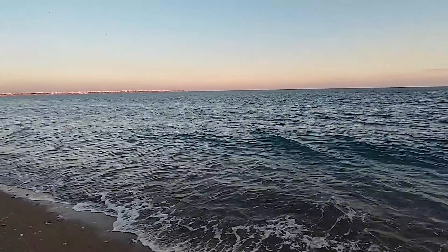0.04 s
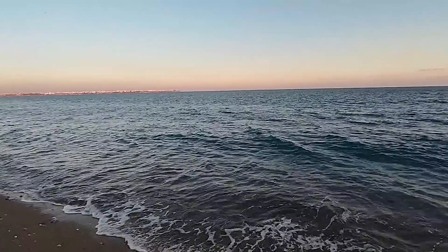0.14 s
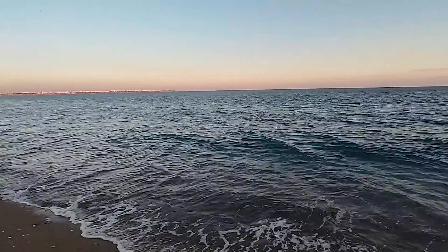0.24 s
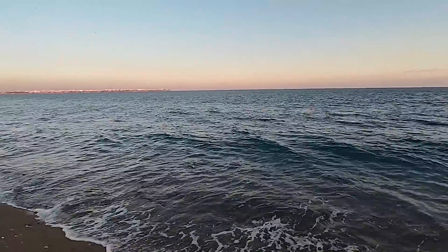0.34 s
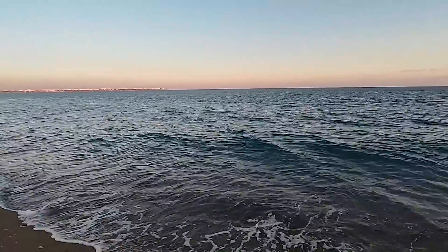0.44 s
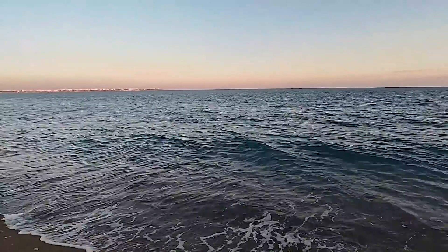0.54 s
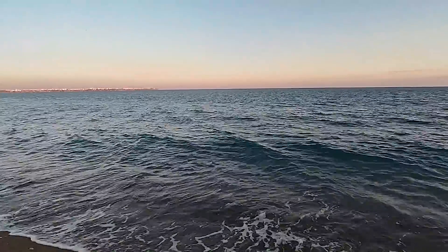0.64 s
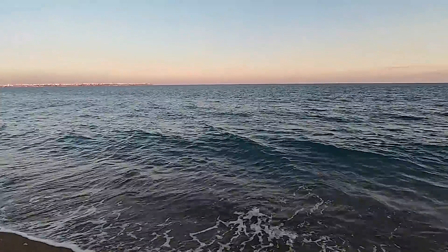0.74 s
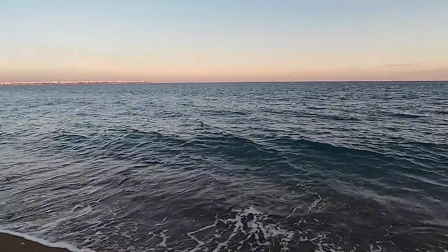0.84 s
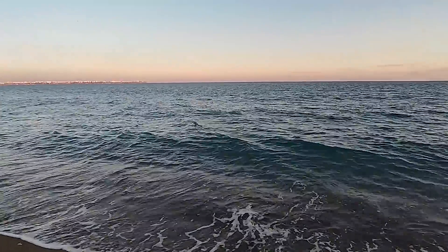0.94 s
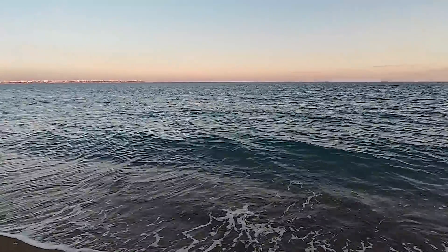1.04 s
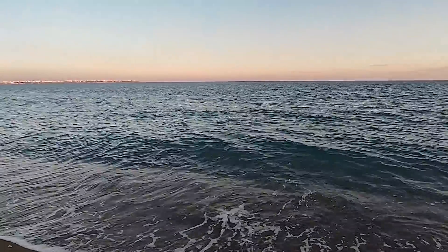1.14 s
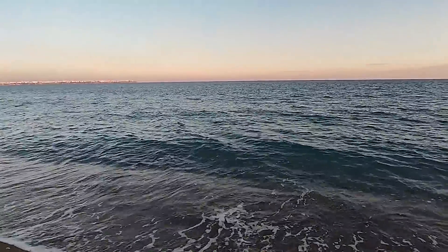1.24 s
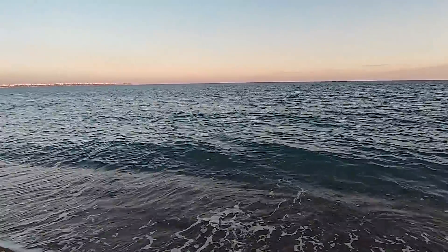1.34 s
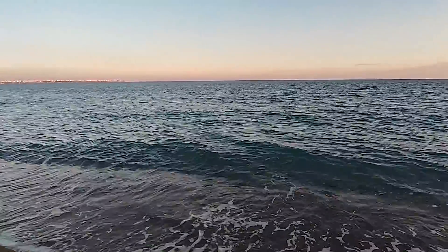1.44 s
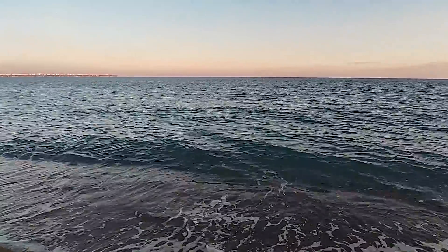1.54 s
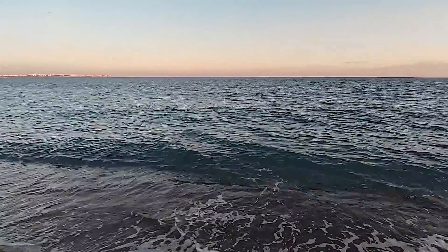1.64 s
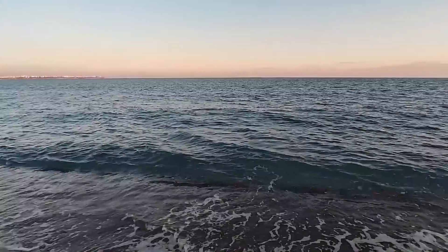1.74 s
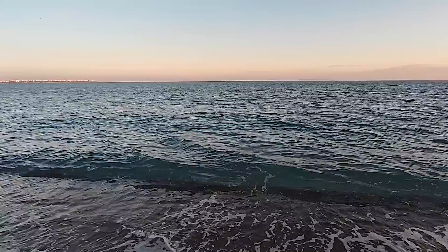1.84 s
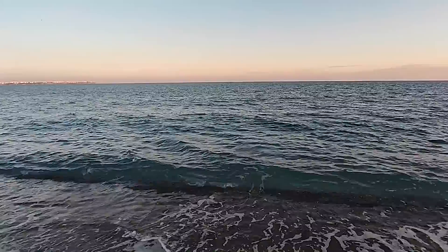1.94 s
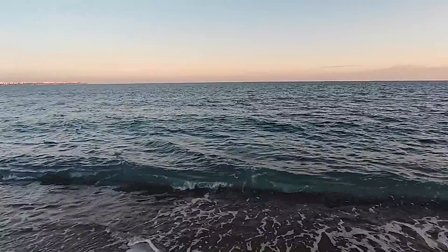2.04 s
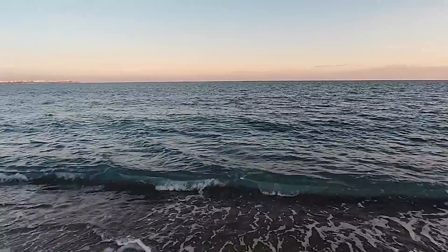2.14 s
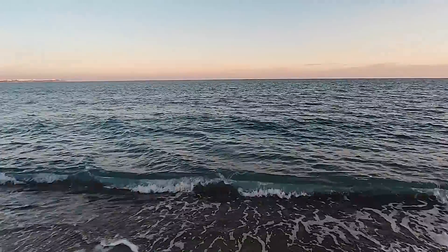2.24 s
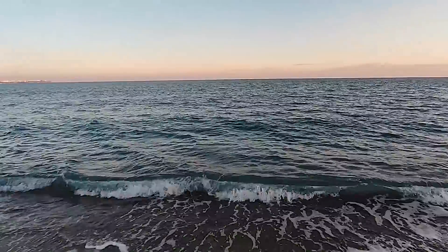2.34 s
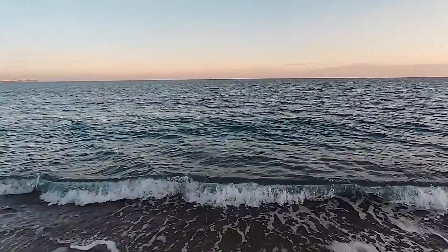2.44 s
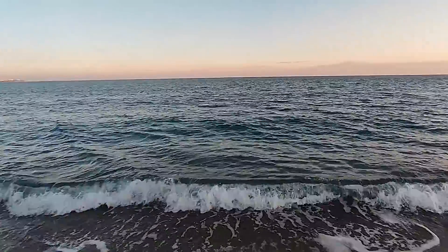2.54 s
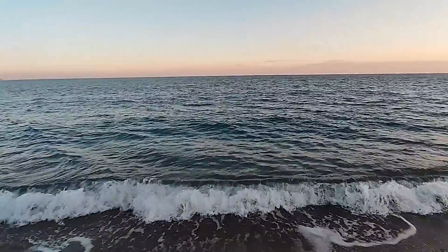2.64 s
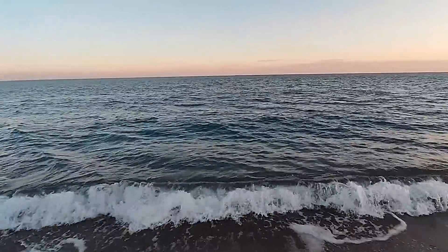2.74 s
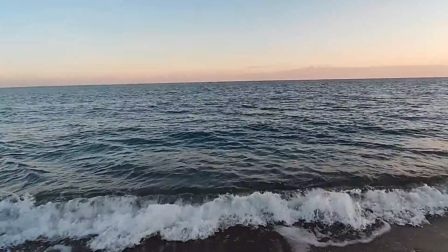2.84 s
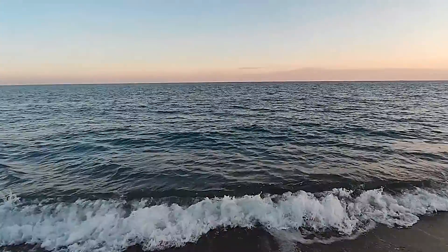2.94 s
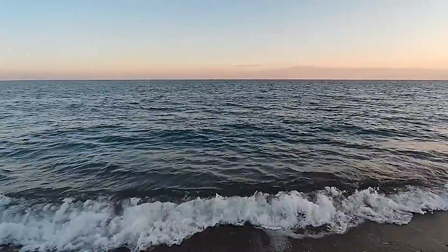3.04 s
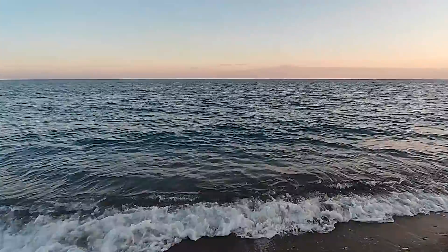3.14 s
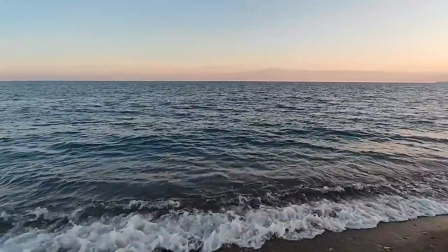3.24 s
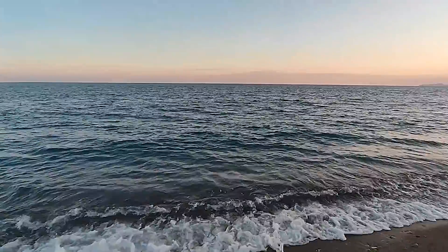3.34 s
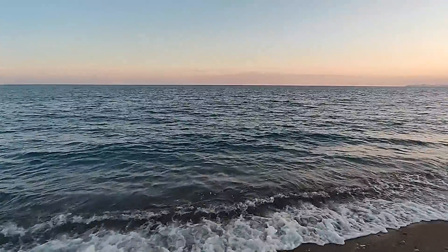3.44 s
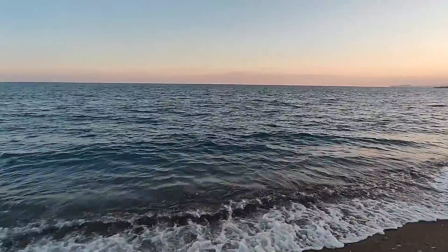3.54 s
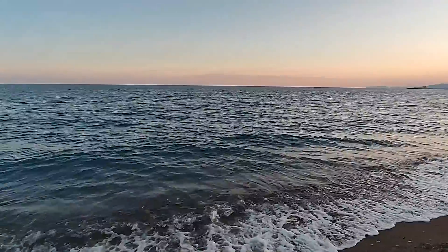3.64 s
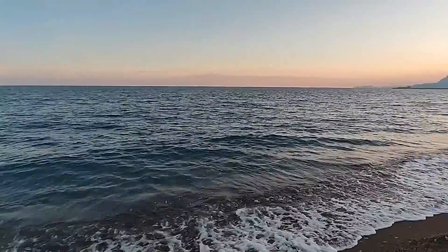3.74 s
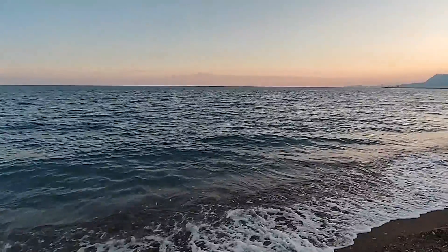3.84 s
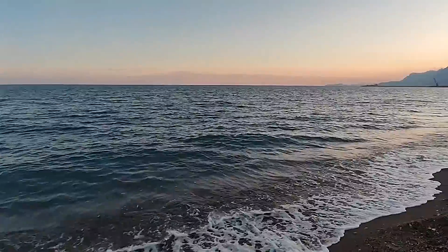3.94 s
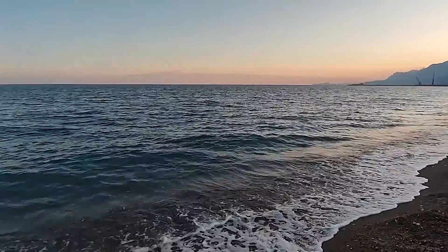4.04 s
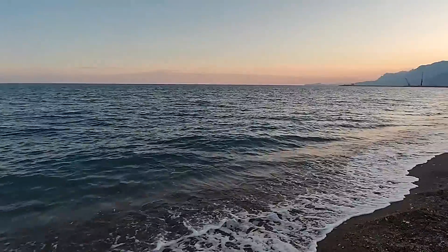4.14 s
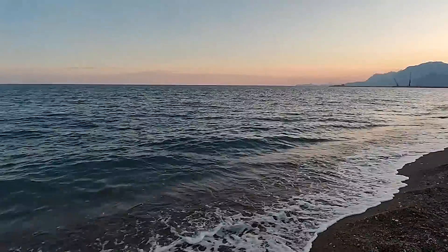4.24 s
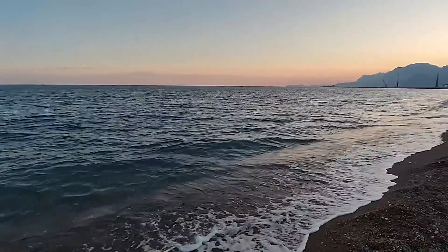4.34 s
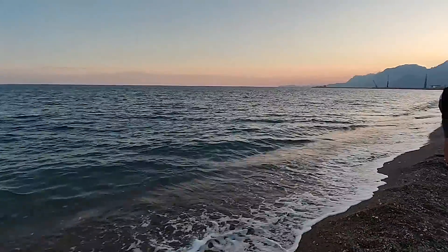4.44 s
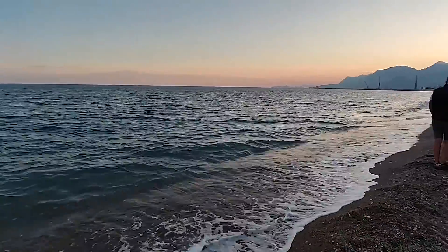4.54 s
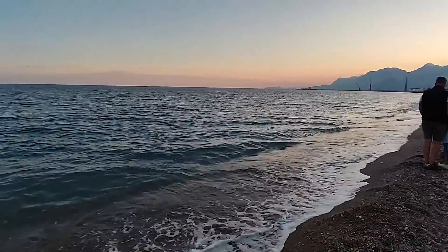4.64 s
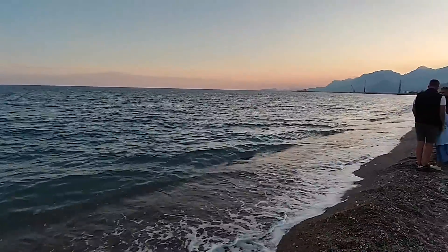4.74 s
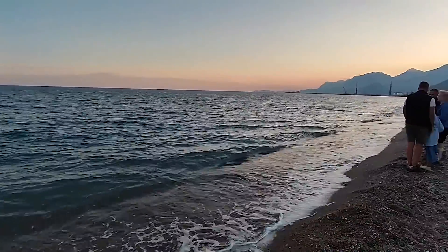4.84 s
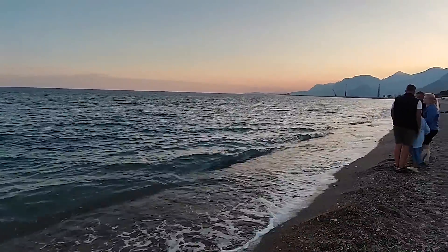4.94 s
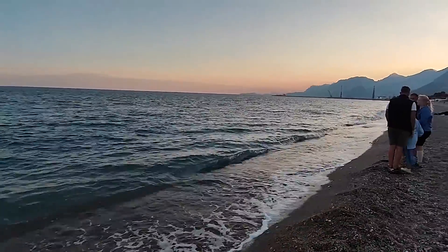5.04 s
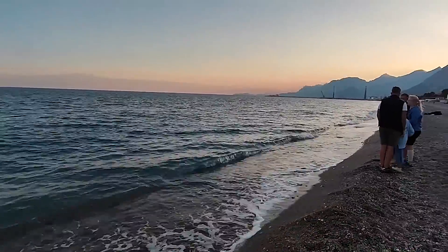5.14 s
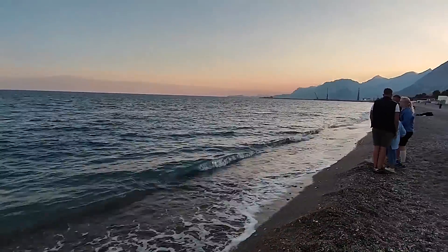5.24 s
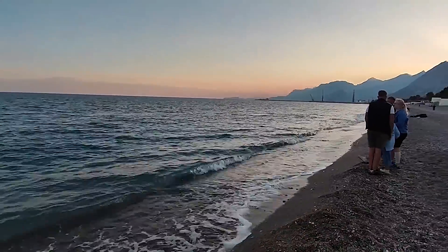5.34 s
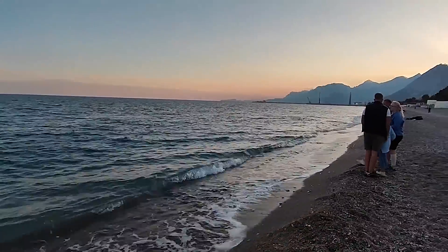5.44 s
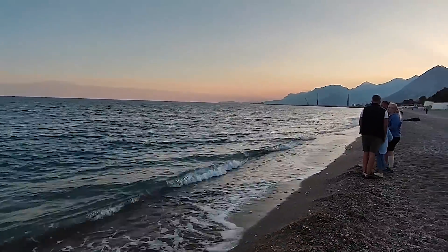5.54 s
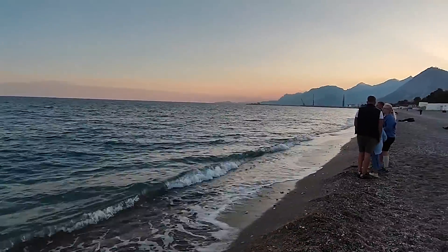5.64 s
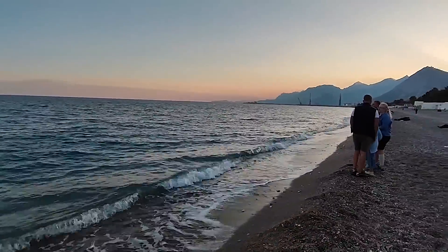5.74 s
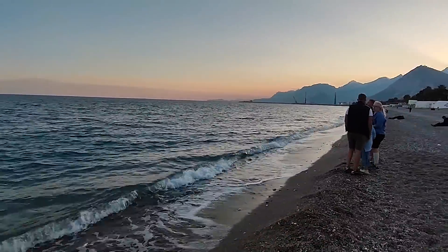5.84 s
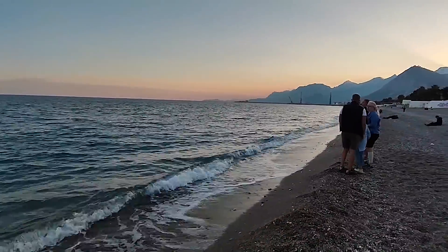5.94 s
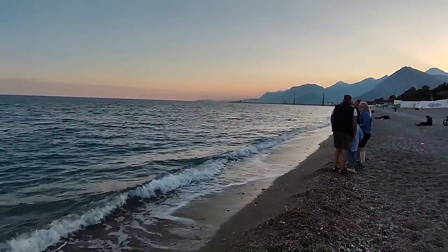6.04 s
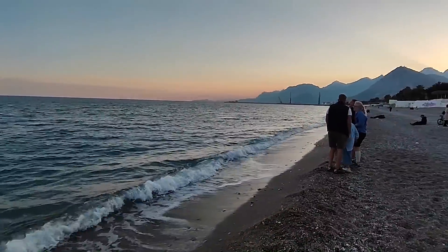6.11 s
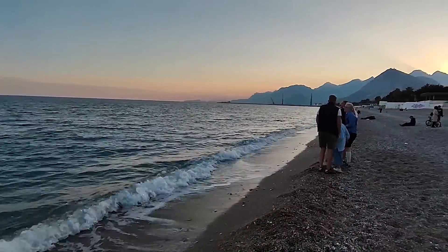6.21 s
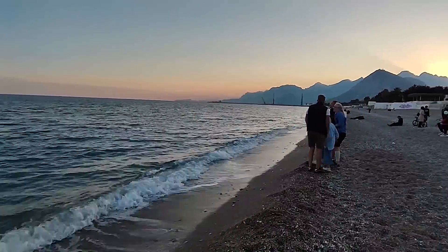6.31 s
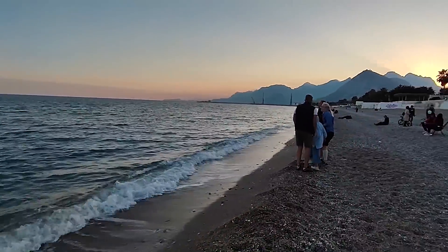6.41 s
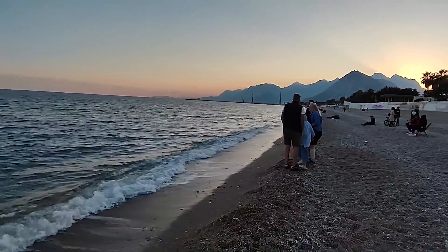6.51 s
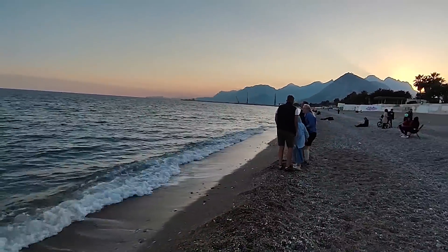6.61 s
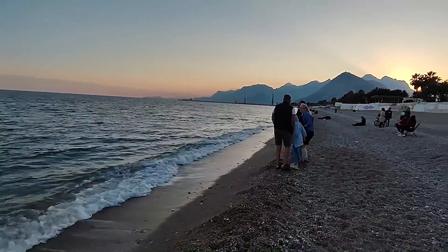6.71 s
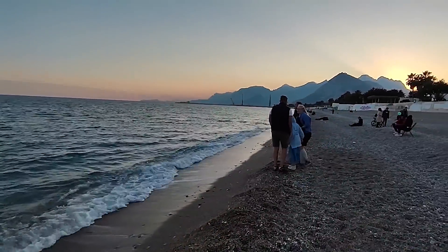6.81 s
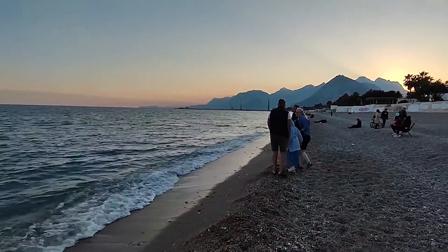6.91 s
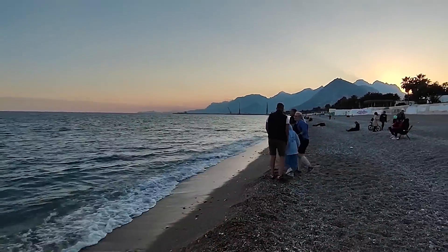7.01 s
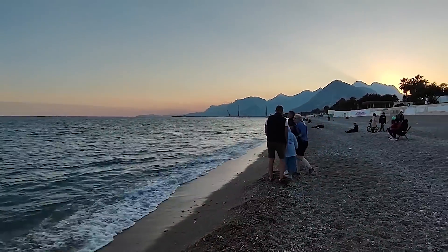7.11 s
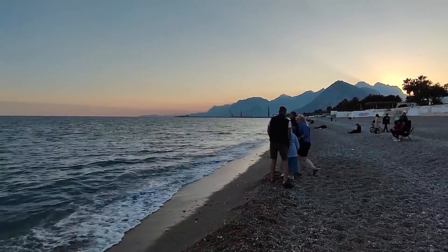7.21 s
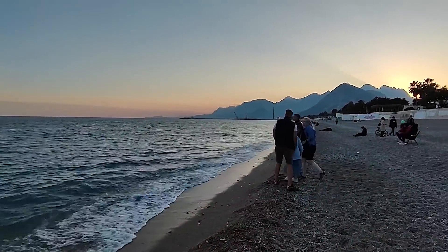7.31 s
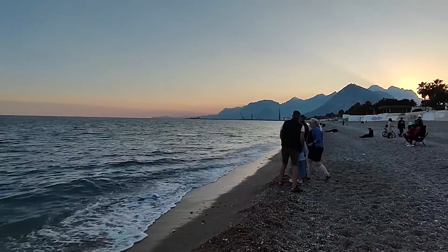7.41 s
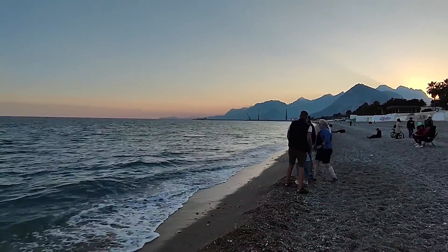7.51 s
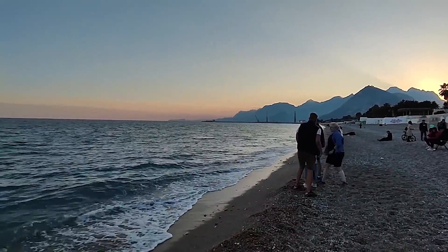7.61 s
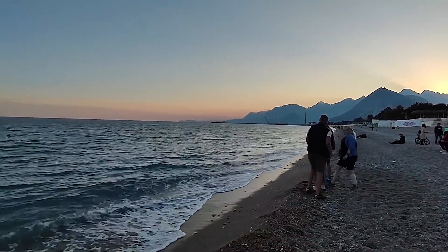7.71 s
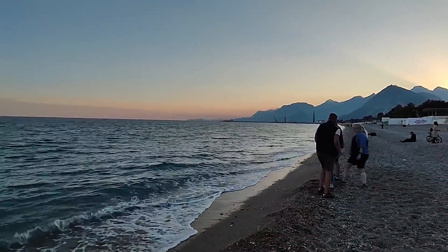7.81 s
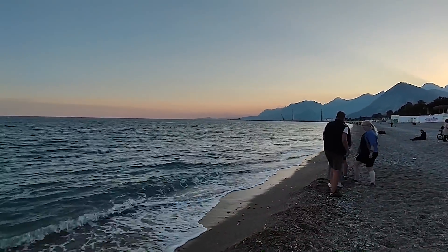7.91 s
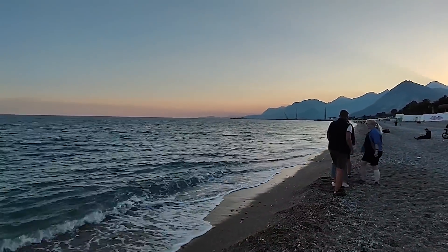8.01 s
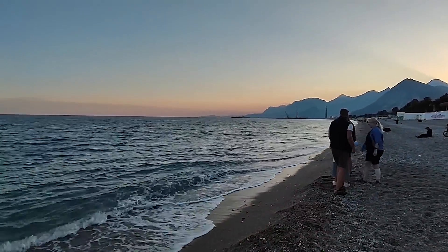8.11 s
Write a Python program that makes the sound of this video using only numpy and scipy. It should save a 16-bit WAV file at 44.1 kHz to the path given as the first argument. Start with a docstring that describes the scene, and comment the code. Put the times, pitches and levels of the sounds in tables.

```python
"""Small waves on a pebble beach. Wind buffets a camera's two microphone ports throughout, as filtered noise.
A weak wave builds while narrow bands of surf hiss glide upward; a pebble clacks as a damped ring.
At 2.2 s a wave plunges: noise and bubble rings roar, stone ticks hiss, then foam pops linger up the beach.
The hand-held camera turns from the sea to look along the shore by 4.8 s, and the next crest gurgles in
swells of noise. A second wave plunges at 5.7 s; near 7.6 s a very high hiss passes as a third begins."""
import sys
import numpy as np
from scipy import signal
from scipy.fft import rfft, irfft, next_fast_len
from scipy.io import wavfile
from scipy.ndimage import uniform_filter1d, map_coordinates

SR = 44100
rng = np.random.default_rng(int(sys.argv[2]) if len(sys.argv) > 2 else 0)


def inscribe(sig):
    """Save sig as 16-bit PCM at rate SR to the path in sys.argv[1].

    A 1-D sig is mono; a 2-D sig holds one channel per row.
    Samples are clipped to [-1, 1] before scaling.
    """
    pcm = np.round(np.clip(np.atleast_2d(sig).T, -1, 1) * 32767)
    wavfile.write(sys.argv[1], SR, pcm.astype(np.int16))


N = 360193


def amp(db):
    """Decibels to gain."""
    return 10 ** (np.asarray(db) / 20)


def unit(x):
    """Scale to rms 1."""
    return x / np.sqrt(np.mean(x ** 2) + 1e-20)


def along(points, hz):
    """Read (frequency, value) points on a log frequency axis."""
    point_hz, value = np.transpose(points)
    return np.interp(np.log(hz + 1), np.log(point_hz + 1), value)


def curve(points):
    """Draw a (time, value) curve, one value per sample."""
    times_s, values = np.transpose(points)
    return np.interp(np.arange(N) / SR, times_s, values)


def wobble(rate):
    """A smooth random curve, rate knots a second."""
    knots = rng.standard_normal(int(N * rate / SR) + 4)
    coarse = np.arange(0, N + 32, 32)
    return np.interp(np.arange(N), coarse, map_coordinates(knots, [coarse * rate / SR]))


def filtered(x, response):
    """Filter x by a gain that is a function of frequency."""
    size = next_fast_len(x.shape[-1] + 8192)
    spectrum = rfft(x, size) * response(np.fft.rfftfreq(size, 1 / SR))
    return irfft(spectrum, size)[..., :x.shape[-1]]


def coloured(x, spectrum):
    """Shape x by a spectrum, then bring it to rms 1."""
    return unit(filtered(x, lambda hz: amp(along(spectrum, hz))))


def swell(centre_s, half_length_s):
    """A bell-shaped envelope around a moment."""
    distance = (np.arange(N) / SR - centre_s) / half_length_s
    return np.exp(-.5 * np.minimum(distance ** 2, 60))


def bursts(rows, spectrum):
    """Short swells of noise, one for each (centre_s, level_db, half_length_s) row."""
    total = np.zeros(N)
    flutter = coloured(rng.standard_normal(N), spectrum)
    for centre_s, level_db, half_length_s in rows:
        shape = swell(centre_s, half_length_s)
        local_rms = np.sqrt(np.average(flutter ** 2, weights=shape ** 2))
        total += amp(level_db) * shape * flutter / local_rms
    return total


def rush(patchy_db):
    """Two unrelated white noises with shared, drifting patches of random gain."""
    z = signal.stft(rng.standard_normal((2, N)), nperseg=512)[2]
    field = uniform_filter1d(rng.standard_normal(z.shape[1:]), size=7, axis=0)  # across frequency
    field = uniform_filter1d(field, size=14, axis=1)  # across time
    return unit(signal.istft(z * amp(patchy_db * unit(field)), nperseg=512)[1][:, :N])


def grains(low_hz, high_hz, cycles, rise, scatter_db, count, size):
    """Two unrelated streams of tiny damped rings; a few are much larger than the rest."""
    t, streams = np.arange(size) / SR, []
    for draw in rng.random((2, count, 4)):
        when, pitch, strength, sign = draw.T[:, :, None]
        hz = low_hz + (high_hz - low_hz) * pitch
        age = hz * t / cycles
        loudness = amp(-scatter_db * np.log(np.maximum(strength, .004)))
        gain = loudness * np.sqrt(hz) * np.sign(sign - .5)
        glide = 1 + rise * np.minimum(age, 2)
        ring = gain * np.exp(-age) * np.sin(2 * np.pi * hz * t * glide)
        places = (when * N).astype(int) + np.arange(size)
        streams.append(np.bincount(places.ravel(), ring.ravel(), N)[:N])
    return unit(np.array(streams))


def together(calm_db, *envelopes):
    """Unrelated waves add in power, over the calm sea between them."""
    return np.sqrt(amp(calm_db) ** 2 + np.sum(np.vstack(envelopes) ** 2, axis=0))


# stretches of crest that build, tumble and collapse; along the shore the far end breaks first:
# start_s, rise_s, hold_s, strength_db, extra_stones_db, run_up_db (all dB relative)
CRESTS = [(0.02, 1.4, 1.4, -12.5, -8, -20.5), (2.179, 0.55, 0.83, -0.02, 0, 1),
          (5.1, 0.59, 0.24, -8, 3.5, -4), (5.68, 0.46, 0.65, -0.87, 1.95, -11.5),
          (7.54, 0.24, 0.18, -13, 2.5, -10), (7.812, 0.31, 0.3, -7, 8, -10)]
SAG_DB_PER_S = 2  # tumbling waves weaken, before grows scales the loss
RUN_UP_S, LATE_S = 1.35, 1.89  # after the crest, a sheet of water climbs the beach; a later stage follows
SOAK_DB_PER_S = 19  # extra loss as what is left soaks into the stones


def surges(lag_s, fall_db_per_s, grows):
    """Rise, sagging hold and fall of each crest; grows sets how steeply sound follows its force."""
    start_s, rise_s, hold_s, strength_db, _, _ = np.transpose(CRESTS)[:, :, None]
    age = np.arange(N) / SR - start_s - lag_s
    loss_db = SAG_DB_PER_S * np.clip(age - rise_s, 0, hold_s)
    fall_db = fall_db_per_s * np.maximum(age - rise_s - hold_s, 0)
    force = np.clip(age / rise_s, 0, 1) * amp(strength_db - loss_db)
    return force ** grows * amp(-fall_db)


def run_ups(late_loss_db_per_s):
    """The sheet of water each crest sends up: it climbs, changes slowly in level, then soaks away."""
    start_s, rise_s, *_, run_up_db = np.transpose(CRESTS)[:, :, None]
    age = np.arange(N) / SR - start_s - rise_s
    late_db = late_loss_db_per_s * np.maximum(age - RUN_UP_S, 0)
    soaked_db = SOAK_DB_PER_S * np.maximum(age - RUN_UP_S - LATE_S, 0)
    return np.clip(age / RUN_UP_S, 0, 1) * amp(run_up_db - late_db - soaked_db)


# where the camera faces: time_s, heading (0 seaward, 1 along the shore to the right)
CAMERA_HEADING = [(0, -0.32), (2.5, 0.34), (3.4, -0.22), (4.2, 0.67), (4.8, 0.99), (8.17, 1)]


def bearing(nearness=0.72):
    """Aim along the shore, force of the breaker close by, and how obliquely the surf arrives."""
    aim = np.clip(curve(CAMERA_HEADING), 0, 1)
    breaking = surges(lag_s=0, fall_db_per_s=10.5, grows=0.8).max(axis=0)
    breaking = np.clip(breaking, 0, 1)
    return aim, breaking, aim * (1 - nearness * breaking)


# gain of the right port's resonant cavity over the left: freq_hz, facing_sea_db, facing_along_shore_db
RIGHT_PORT_CAVITY = [(400.0, -2, -5.5), (720, -5, -0.5), (1190, 3.5, 1), (1470, 0.6, 0), (1970, 3.5, 3),
                     (2300, 7, 8.5), (2420, 10, 7), (2840, 7, 4.5), (3320, 3, 7), (3830, 5, 9),
                     (4760, 10, 14), (5440, 8, 13), (6450, 0.5, 6.5), (7370, -1.5, 3.5), (9440, -7, -2),
                     (11060, 2, 5.5), (12800.0, -8, -4), (14500.0, -2.5, 2)]


def ports(pair, gap_s=0.000403, blur_hz=2000, bend_hz=1000, front_width=1.32,
          left_share=0.31, left_gain=0.31, right_share=0.75, right_loss=0.78):
    """Sound from a long shoreline at two ports: each end of the beach reaches its own port first."""
    hz, t, (a, b) = signal.stft(pair, SR, nperseg=512)
    aim, breaking, turn = (np.interp(t, np.arange(N) / SR, c) for c in bearing())
    left = left_share + left_gain * aim  # turning puts the sea on the left
    right = right_share * (1 - aim) * (1 - right_loss * breaking)
    f = hz[:, None]
    bend = f / np.hypot(f, bend_hz)
    from_left = np.exp(-2j * np.pi * f * gap_s * bend)  # long waves lag less across the body
    from_right = np.exp(2j * np.pi * f * gap_s)
    from_front = np.sinc(front_width * f * gap_s)  # a broad front of surf
    likeness = 1 / np.hypot(1, f / blur_hz * bend)  # short waves scatter off the camera
    arrivals = left * from_left + right * from_right + (1 - left - right) * from_front
    alike = arrivals * likeness
    right_port = alike * a + np.sqrt(np.clip(1 - abs(alike) ** 2, 0, 1)) * b
    port_hz, seaward_db, sideways_db = np.transpose(RIGHT_PORT_CAVITY)
    front_db = along(np.c_[port_hz, seaward_db], f)
    side_db = along(np.c_[port_hz, sideways_db], f)
    cavity = amp(front_db + turn * (side_db - front_db))
    return signal.istft(np.array([a, right_port * cavity]), nperseg=512)[1][:, :N]


def buffet(spectrum, lumpy_db):
    """Turbulence at one port: quick lumps around a steady mean strength."""
    lumps = coloured(rng.standard_normal(N), spectrum) * amp(lumpy_db * wobble(45))
    return lumps / np.sqrt(abs(uniform_filter1d(lumps ** 2, size=7000)) + 1e-9)


# single eddies that hit one port: centre_s, level_db, half_length_s, port
EDDY_HITS = [(0.087, -23, 0.017, "right"), (0.27, -29, 0.019, "right"), (0.502, -24, 0.033, "left"),
             (0.6, -18.5, 0.0031, "right"), (0.763, -26, 0.024, "right"), (0.918, -23, 0.011, "right"),
             (0.996, -24.5, 0.03, "left"), (1.207, -25, 0.0082, "right"), (1.753, -23.5, 0.0066, "right"),
             (1.948, -31, 0.038, "right"), (2.56, -24, 0.053, "right"), (3.297, -24.5, 0.045, "left"),
             (3.475, -24, 0.0078, "right"), (3.697, -25, 0.017, "right"), (3.856, -22.5, 0.023, "right"),
             (4.12, -17.5, 0.01, "right"), (4.155, -23, 0.007, "right"), (4.453, -35.5, 0.037, "left"),
             (6.113, -22.5, 0.01, "right"), (7.325, -21, 0.0044, "right"), (7.453, -26, 0.0059, "right"),
             (7.603, -18, 0.004, "right"), (7.795, -28, 0.043, "right")]


def eddies(port, spectrum):
    """The thumps of the eddies that hit one port, as short swells of noise."""
    return bursts([row[:3] for row in EDDY_HITS if row[3] == port], spectrum)


# strength of the wind: time_s, level_db (relative)
WIND_STRENGTH = [(0.0, -28.5), (1.35, -30.5), (1.95, -29.5), (2.2, -31), (2.55, -29), (3.0, -28.5),
                 (3.45, -30), (3.8, -32.5), (4.05, -33.5), (4.3, -37), (4.5, -32), (4.85, -34),
                 (5.05, -42.5), (5.45, -40), (5.75, -28.5), (6.6, -34), (7.9, -28), (8.17, -29.5)]
# colour of the wind at each port, of its sharper flaps, and of its slow push: freq_hz, level_db (relative)
LEFT_WIND_COLOUR = [(10, -12), (45, -9), (90, 1.5), (150, -4), (200, -9), (320, -17), (1500, -58.5)]
RIGHT_WIND_COLOUR = [(10, -30), (45, -6.5), (90, 3.5), (150, 3.5), (200, -1.5), (320, -8), (450, -19),
                     (2000, -50)]
FLAP_COLOUR = [(70, -21), (140, 1), (200, 2), (330, -4.5), (520, -13), (800, -27.5), (2000, -55)]
PUSH_COLOUR = [(8, -25), (20, 2), (45, 1), (80, -10), (200, -57)]
LEE_DB = 8.5  # facing along the shore puts the left port in the lee


def wind(left_db=-2.0, right_db=-0.47, gust_db=1.63, deep_left_db=-10, deep_right_db=-16,
         deep_left_turn_db=1.5, deep_right_turn_db=10):
    """Turbulence presses on each port separately; the right also catches sharp, higher flaps."""
    heading = curve(CAMERA_HEADING)
    left_gain = amp(left_db - LEE_DB * heading + gust_db * wobble(5.7))
    left = left_gain * buffet(LEFT_WIND_COLOUR, lumpy_db=2)
    flaps = amp(-8) * buffet(FLAP_COLOUR, lumpy_db=3)
    right_gain = amp(right_db + gust_db * wobble(7))
    right = right_gain * (buffet(RIGHT_WIND_COLOUR, lumpy_db=2.5) + flaps)
    # the slow push strengthens as the camera turns, slightly at the left port, strongly at the right
    push_db = [deep_left_db + deep_left_turn_db * heading, deep_right_db + deep_right_turn_db * heading]
    push = amp(push_db) * np.array([buffet(PUSH_COLOUR, lumpy_db=11.5) for port in range(2)])
    thumps = np.array([eddies("left", LEFT_WIND_COLOUR), eddies("right", FLAP_COLOUR)])
    return amp(curve(WIND_STRENGTH)) * (np.array([left, right]) + push) + thumps


def thin_hiss(centre_s=7.575, half_length_s=0.092, level_db=-51):
    """A brief, very high hiss: noise under a flat-topped envelope."""
    shape = np.exp(-((np.arange(N) / SR - centre_s) / half_length_s) ** 4)
    noise = coloured(rng.standard_normal((2, N)), [(5000, -25), (10500, 5), (15000, -7)])
    return amp(level_db) * shape * noise


def stone_click(start_s=1.9968, level_db=-27.0, t60_s=.008, ring_hz=4600):
    """One nearby pebble clacks against another: a sharp crack and a very short ring."""
    t = np.arange(SR // 20) / SR
    crack_colour = [(1000, -35), (3000, -8), (5000, 9), (9000, -13), (16000, -20)]
    crack = coloured(rng.standard_normal((2, len(t))), crack_colour)
    ring = np.sin(2 * np.pi * ring_hz * t)
    click = (crack + ring) * amp(level_db - 60 * t / t60_s) * amp([[-9], [0]])  # softer on the left
    return np.pad(click, ((0, 0), (round(start_s * SR), N)))[:, :N]


# narrow hiss bands that glide upward: centre_s, half_length_s, centre_hz, level_db (before the ports)
GLIDING_HISS = [(0.749, 0.22, 4920, -57), (1.43, 0.12, 5100, -57)]


def surf_glides(width_hz=290, rise_hz_per_s=1100):
    """Narrow bands of surf hiss swell and glide upward: low noise shifted to a rising pitch."""
    t, total = np.arange(N) / SR, np.zeros((2, N))
    for centre_s, half_length_s, centre_hz, level_db in GLIDING_HISS:
        noise = rng.standard_normal((2, 2, N))
        band = unit(filtered(noise, lambda hz: 1 / (1 + (hz / width_hz) ** 2)))
        phase = 2 * np.pi * np.cumsum(centre_hz + rise_hz_per_s * (t - centre_s)) / SR
        glide = band[0] * np.cos(phase) + band[1] * np.sin(phase)
        total += amp(level_db) * swell(centre_s, half_length_s) * glide
    return total


# colour of bursting foam: freq_hz, level_db (relative)
FOAM_COLOUR = [(2000, -31), (5000, -3), (7000, 1), (8000, -3.5), (8800, 3), (10500, -2), (14500, 1.5),
               (16000, -6)]


def foam(fizz_db=-39.5, linger_db=-50.5, calm_db=-58.5):
    """Tiny bubbles burst all over the white water and linger where it runs up the beach."""
    fresh = amp(fizz_db) * surges(lag_s=0, fall_db_per_s=28, grows=1.47)
    lingering = amp(linger_db) * run_ups(late_loss_db_per_s=-0.7)  # a slight growth
    flicker_db = .35 * wobble(18)
    pops = grains(3800, 15000, cycles=1.8, rise=0, scatter_db=1.0, count=18000, size=36)
    fizz = coloured(rush(patchy_db=2.6) + amp(-4.0) * pops, FOAM_COLOUR)
    return fizz * together(calm_db, fresh, lingering) * amp(flicker_db)


# colour of rolling stones: freq_hz, level_db (relative)
PEBBLE_COLOUR = [(500, -19), (1500, -0.5), (2400, 0.5), (3600, 0.5), (5200, -2.5), (6500, -1.5), (8000, -9),
                 (11000, -14), (16000, -34)]


def pebbles(hiss_db=-34.5, run_up_db=-42.0, calm_db=-51.0, shade_db=-3.0, oblique_db=-2.0, open_db=3.5):
    """Each breaker, then its run-up, rolls countless small stones, which tick against each other."""
    *_, stones_db, _ = np.transpose(CRESTS)[:, :, None]
    dragged = amp(hiss_db + stones_db) * surges(lag_s=0, fall_db_per_s=29.5, grows=0.93)
    washed = amp(run_up_db) * run_ups(late_loss_db_per_s=7.0)
    ticks = grains(1496, 8760, cycles=4.4, rise=0, scatter_db=2.0, count=14000, size=100)
    surge_db = .55 * wobble(15)
    hiss = coloured(rush(patchy_db=0.96) + amp(-10) * ticks, PEBBLE_COLOUR)
    hiss = hiss * together(calm_db, dragged, washed) * amp(surge_db)
    _, breaking, turn = bearing()
    # the body shades the left port, less so from a breaker in front
    left_db = shade_db + oblique_db * turn + open_db * breaking
    return ports(hiss) * amp([left_db, np.zeros(N)])


# the next crest curls farther up the beach: centre_s, level_db (before the ports), half_length_s
CREST_GURGLES = [(5.185, -44.5, 0.014), (5.42, -59, 0.034), (5.64, -40, 0.091)]
# colour of the gurgle: freq_hz, level_db (relative)
GURGLE_COLOUR = [(250, -42), (600, 5), (1000, -8), (2000, -35)]


def gurgles():
    """The curling crest gurgles in short swells of low, unrelated noise."""
    return np.array([bursts(CREST_GURGLES, GURGLE_COLOUR) for side in range(2)])


# colour of the bubbly roar and of the plunging boom: freq_hz, level_db (relative)
ROAR_COLOUR = [(60, -28), (200, -15.5), (400, -3), (700, -0.5), (1100, -5), (1600, -6), (2500, -12.5),
               (5000, -26.5), (9000, -25.5), (16000, -42)]
BOOM_COLOUR = [(30, -44), (100, -2), (220, 4), (330, 2.5), (500, -7.5), (1000, -4), (3000, -56)]


def breakers(roar_db=-32.0, roar_calm_db=-48.0, boom_db=-29.5, boom_calm_db=-55):
    """Tumbling water roars with bubbles; big air pockets boom mostly while a wave plunges."""
    tumbling = together(roar_calm_db, amp(roar_db) * surges(lag_s=0, fall_db_per_s=27, grows=0.91))
    plunging = together(boom_calm_db, amp(boom_db) * surges(lag_s=0.03, fall_db_per_s=71, grows=1.52))
    bubbles = grains(393.0, 3170, cycles=5.0, rise=0.034, scatter_db=2.0, count=2800, size=700)
    roar = coloured(rush(patchy_db=0) + amp(-11.5) * bubbles, ROAR_COLOUR)
    boom = coloured(rush(patchy_db=0.5), BOOM_COLOUR)
    return roar * tumbling * amp(0.61 * wobble(11)) + boom * plunging * amp(0.9 * wobble(17))


def scene():
    """Water and stones through the ports, with the click, the thin hiss and the wind on top."""
    water = surf_glides() + foam() + gurgles() + breakers()
    return wind() + thin_hiss() + stone_click() + pebbles() + ports(water)


def record(dry, top_hz=15850):
    """The camera keeps nothing above its band limit."""
    return filtered(dry, lambda hz: hz < top_hz)


dry = scene()
out = record(dry)
inscribe(out)
```